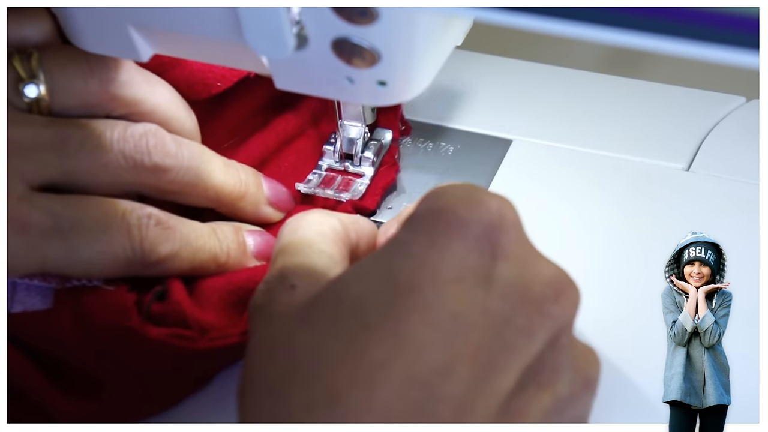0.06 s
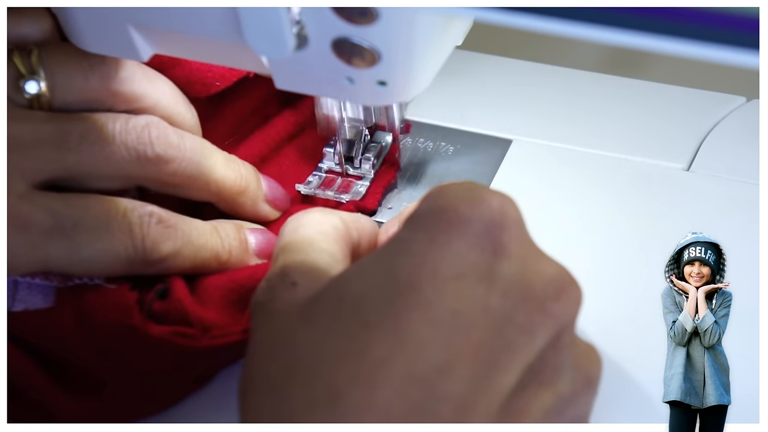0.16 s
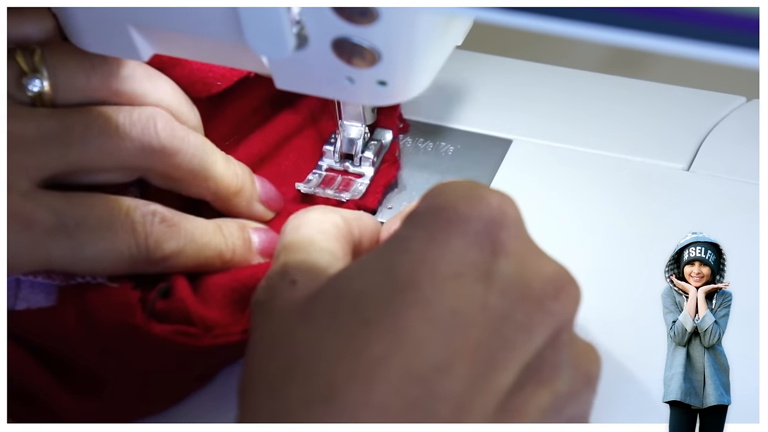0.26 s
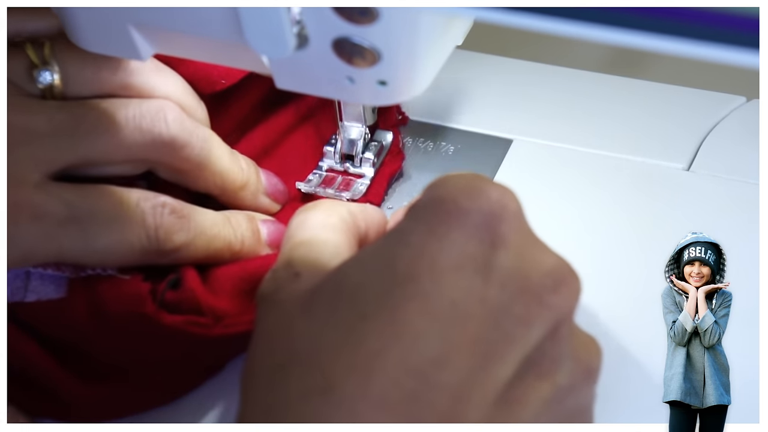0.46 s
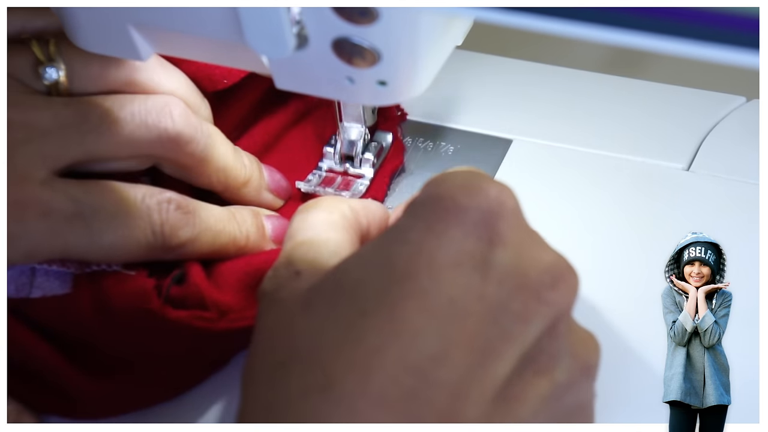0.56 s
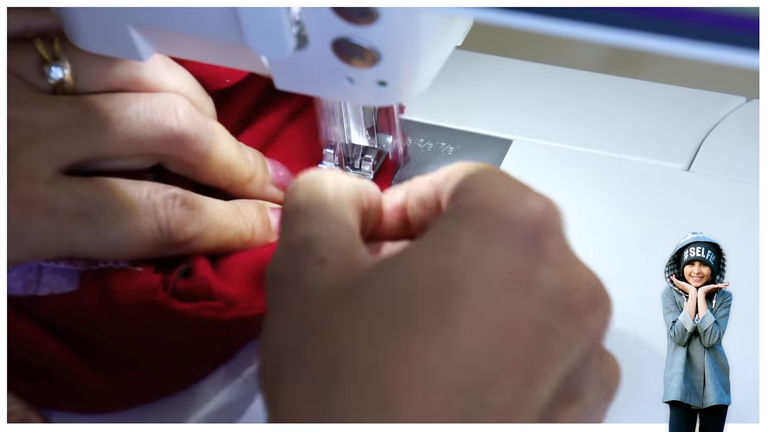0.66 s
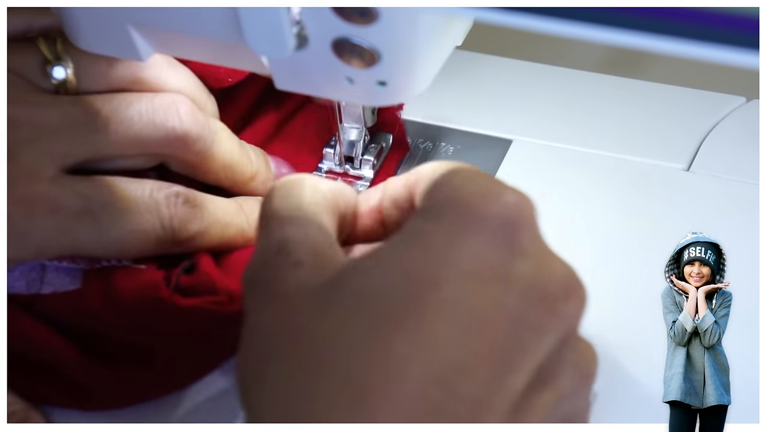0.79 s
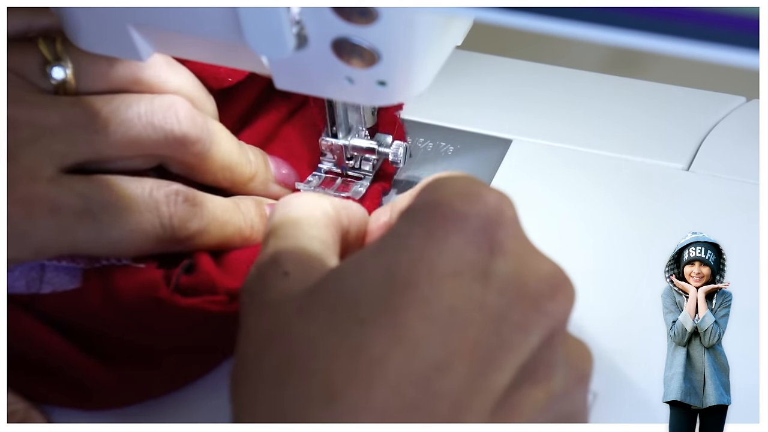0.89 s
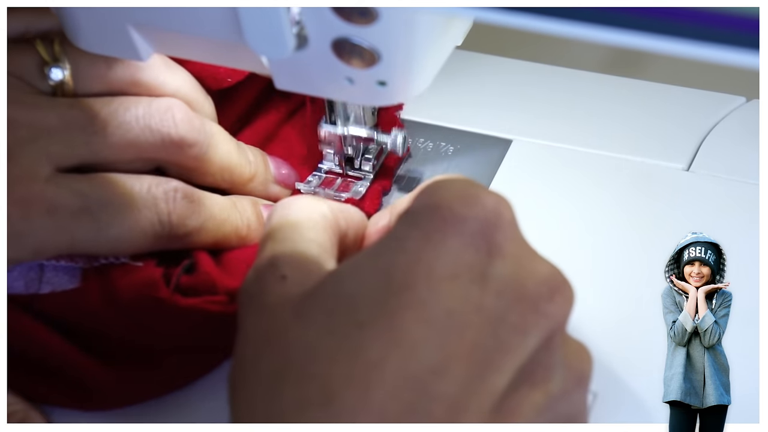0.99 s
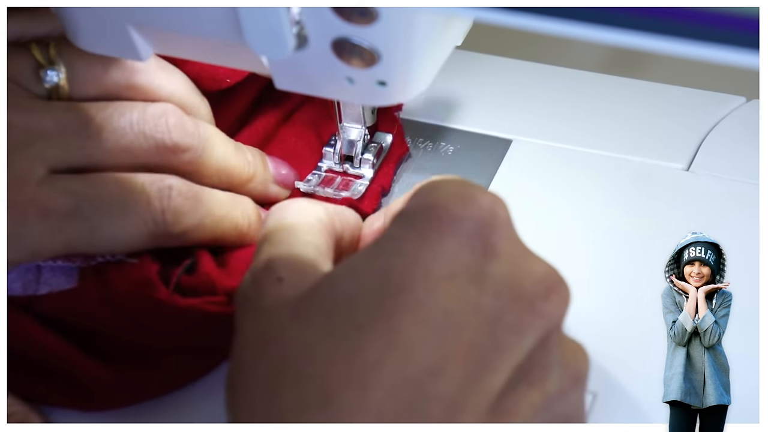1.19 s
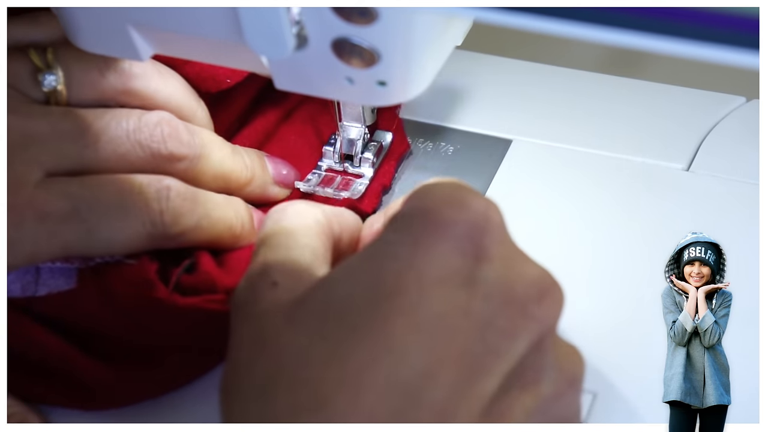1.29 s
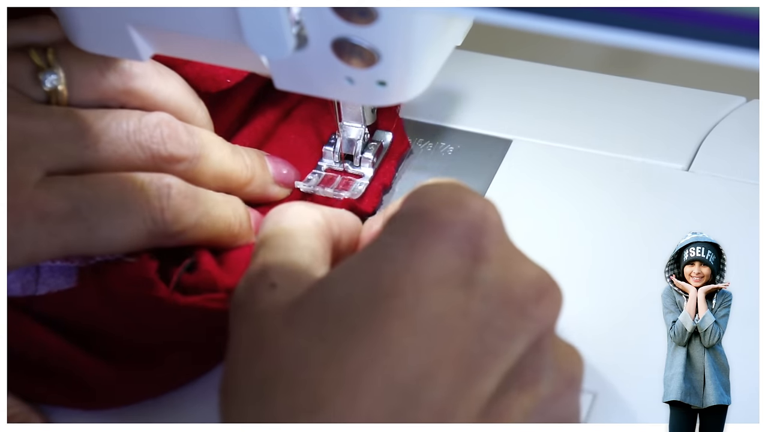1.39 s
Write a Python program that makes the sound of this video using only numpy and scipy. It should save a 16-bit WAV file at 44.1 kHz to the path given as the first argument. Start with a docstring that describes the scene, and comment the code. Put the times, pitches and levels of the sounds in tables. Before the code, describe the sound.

A domestic sewing machine, close by in a small room, starts with a short scrape, hums and whines through six quick ticking stitches, then stops with a hollow clunk. Fabric rustles faintly before and after, with a few soft knocks.

```python
"""A domestic sewing machine, close by in a small room, over a low rumble and faint hiss.
Fabric is nudged under the foot, then the drive starts with a short scrape. As the shaft runs up,
the case drones, the motor hums and whines and the linkages rattle. Six stitches follow, each a
bright tick and duller clacks. The machine coasts to a stop with a hollow clunk, and the fabric
is nudged again among a few soft knocks."""
import sys
import numpy as np
from scipy import signal
from scipy.fft import rfft, irfft
from scipy.io import wavfile
from scipy.ndimage import uniform_filter1d

SR = 44100
rng = np.random.default_rng(int(sys.argv[2]) if len(sys.argv) > 2 else 0)


def waveform_to_disk(signal):
    """Save audio, clipped to [-1, 1], as 16-bit WAV at the path in sys.argv[1]."""
    frames = np.transpose(np.atleast_2d(signal))
    scaled = np.clip(frames, -1, 1) * 32767
    samples = np.round(scaled).astype(np.int16)
    wavfile.write(sys.argv[1], SR, samples)


N = 63945
TIME, FREQ = np.arange(N) / SR, np.fft.rfftfreq(N, 1 / SR)


def amp(db):
    """Decibels to gain."""
    return 10 ** (np.asarray(db) / 20)


def unit(x):
    """Scales to rms 1."""
    return x / np.sqrt(np.mean(abs(x) ** 2) + 1e-20)


def curve(points):
    """A control curve over time."""
    return np.interp(TIME, *np.transpose(points))


def spectrum(points):
    """A table read on a log-frequency axis."""
    hz, value = np.transpose(points)
    return np.interp(np.log(FREQ + 1), np.log(hz + 1), value)


def wander(rate_hz):
    """Random motion of rms 1, mostly below rate_hz."""
    return unit(irfft(rfft(rng.standard_normal(N)) / (1 + (FREQ / rate_hz) ** 4), N))


def flutter(depth_db, rate_hz):
    """An uneven gain of rms 1."""
    return unit(amp(depth_db * wander(rate_hz)))


def steady(x):
    """Evens out the slow swells of a noise, leaving its fast churn."""
    return x / np.sqrt(uniform_filter1d((x ** 2).mean(0), size=1800))


def tone(cycles, width_hz):
    """A wavering tone of rms 1 that follows a count of cycles."""
    drift = np.cumsum(width_hz / 2 * wander(width_hz)) / SR
    return np.sqrt(2) * np.sin(2 * np.pi * (cycles + drift + rng.random()))


def burst(start_s, rise_s, decay_s, hold_s=0):
    """Linear attack, hold, exponential release."""
    t = TIME - start_s
    return np.clip(t / rise_s, 0, 1) * np.exp(-np.maximum(t - rise_s - hold_s, 0) / decay_s)


# Stereo phase. Each row: frequency in Hz, lead of the left channel in radians.
LEFT_LEAD = [(0, 0.51), (340, 0.97), (1120, -0.0067), (3270, -0.52), (5940, 0.37), (9130, 0.25),
             (9820, -1.2), (13400, 0.72)]
# Stereo balance. Each row: frequency in Hz, left minus right in dB.
BALANCE = [(60, 3.5), (200, -2), (700, -1), (8120, -0.7), (15000, -3.5)]


def stereo(left, right):
    """Two spectra to a stereo signal, offset in level and phase."""
    side = amp(spectrum(BALANCE) / 2)
    lag = np.exp(-1j * spectrum(LEFT_LEAD))
    return irfft(np.array([left * side, right * lag / side]), N)


# Likeness of the channels. Each row: frequency in Hz, correlation from 0 to 1.
COHERENCE = [(30, 0.7), (150, 0.98), (400, 0.94), (1000, 0.69), (2400, 0.6), (5000, 0.79), (8000, 0.92),
             (13000, 0.28)]


def noise(colour_db):
    """Coloured stereo noise of rms 1, partly alike in both channels."""
    shared, separate = rfft(rng.standard_normal((2, N))) * amp(colour_db)
    likeness = spectrum(COHERENCE)
    return unit(stereo(shared, likeness * shared + np.sqrt(1 - likeness ** 2) * separate))


# Rumble and hiss spectra. Each row: frequency in Hz, gain in dB.
RUMBLE_COLOUR = [(20, -31), (40, -6), (63, -8.5), (85, -36), (110, -11), (145, -14), (176, -0.5), (210, -4),
                 (370, -9), (750, -27), (1000, -45), (16000, -63)]
HISS_COLOUR = [(500, 0), (1400, 1), (2200, -3), (4200, 1), (5800, -4), (7500, -3), (11000, -7),
               (13000, -14), (16000, -18)]
# Their envelopes. Each row: time in seconds, level in dB.
RUMBLE_ENVELOPE = [(0, -52.5), (.9, -47.5), (1.3, -52.5), (1.37, -45.5), (1.41, -55)]
HISS_ENVELOPE = [(0, -66), (.8, -63.5), (1, -65.5), (1.25, -66), (1.45, -69)]


def background():
    """Lumpy low room rumble and faint hiss."""
    rumble = steady(noise(spectrum(RUMBLE_COLOUR))) * flutter(depth_db=2, rate_hz=42)
    hiss = noise(spectrum(HISS_COLOUR))
    return amp(curve(RUMBLE_ENVELOPE)) * rumble + amp(curve(HISS_ENVELOPE)) * hiss


def room(x, t60_s=0.24, level_db=-7.5):
    """Wall reflections: a short diffuse tail, different in each channel."""
    t = TIME[:SR // 2]
    tail = rng.standard_normal((2, len(t))) * np.exp(-np.log(1000) * t / t60_s) * (t > .003)
    return amp(level_db) * signal.fftconvolve(x, tail / np.linalg.norm(tail[0]), axes=1)[:, :N]


# Cloth slides. Each row: start in seconds, level in dB, rise and decay in seconds, tilt in dB/octave.
CLOTH_SLIDES = [(0.018, -61, 0.0044, 0.13, 6.5), (0.244, -51.5, 0.0039, 0.013, 8.5),
                (.832, -54.5, .012, 0.017, 5.5), (1.092, -64.5, 0.011, 0.021, 29),
                (1.244, -57.5, 0.021, 0.043, 2), (1.309, -56.5, 0.0081, 0.018, 2.5)]
# Snags of thread and cloth. Each row: start in seconds, level in dB, tilt in dB/octave.
CLOTH_SNAGS = [(0.018, -57, -1), (0.03, -53, -2.5), (.176, -56, 3), (0.215, -58.5, 13.5), (1.257, -61, 4),
               (1.275, -51, -3.5), (1.3078, -52, 7)]
# Their spectra before the tilt. Each row: frequency in Hz, gain in dB.
SLIDE_COLOUR = [(500, -18), (1400, 16), (2200, 2.5), (3900, 18.5), (5500, 1.5), (7500, 3.5), (11500, -7),
                (16000, -23)]
SNAG_COLOUR = [(1500, -12), (4000, -3), (7000, 0), (9500, -6), (11800, -1), (13000, -12), (16000, -19)]


def fabric(pivot_hz=4000):
    """Cloth slides and catches under the presser foot."""
    octaves = np.log2(np.clip(FREQ / pivot_hz, 0.1, 2.5))
    slides = sum(amp(db) * burst(start, rise, decay) * noise(spectrum(SLIDE_COLOUR) + tilt * octaves)
                 for start, db, rise, decay, tilt in CLOTH_SLIDES)
    snags = sum(amp(db) * burst(start, rise_s=0.0011, decay_s=0.0041)
                * noise(spectrum(SNAG_COLOUR) + tilt * octaves) for start, db, tilt in CLOTH_SNAGS)
    return slides * flutter(depth_db=2, rate_hz=400) + snags


# Case resonances. Each row: centre in Hz, width in Hz, lift in dB.
CASE_RESONANCES = [(179.6, 8.9, 6.5), (371.3, 26, 12), (469, 33, 6.5), (660, 24, 8.5), (763, 8.6, 9.5),
                   (832, 32, 8.5)]
# Drone and knock spectra before the resonances. Each row: frequency in Hz, gain in dB.
DRONE_COLOUR = [(20, -29), (55, -33), (85, -17), (115, -6), (145, -12), (180, 0.5), (270, 3), (400, -6),
                (550, -4.5), (750, -15), (2000, -55), (16000, -80)]
KNOCK_COLOUR = [(40, -46), (120, -9), (180, 0), (400, -6.5), (600, -10.5), (900, -29.5), (2000, -59),
                (16000, -70)]
# Drone envelope. Each row: time in seconds, level in dB.
DRONE_ENVELOPE = [(.1, -54.5), (.15, -46.5), (.29, -42.5), (.34, -39.5), (.45, -35), (.53, -35.5),
                  (.58, -31.5), (.74, -32), (.78, -42.5), (.83, -47), (.95, -71)]
# Soft knocks. Each row: start in seconds, level in dB.
CASE_KNOCKS = [(0.235, -39), (0.325, -38), (0.894, -44), (1.182, -46), (1.269, -47), (1.337, -50),
               (1.428, -50)]


def case():
    """The running gear and a few knocks shake the resonant plastic case."""
    modes_db = sum(db / (1 + (2 * (FREQ - hz) / width) ** 2) for hz, width, db in CASE_RESONANCES)
    drone = amp(curve(DRONE_ENVELOPE)) * steady(noise(spectrum(DRONE_COLOUR) + modes_db))
    knocks = sum(amp(db) * burst(start, rise_s=0.0023, decay_s=0.02) for start, db in CASE_KNOCKS)
    return drone + knocks * steady(noise(spectrum(KNOCK_COLOUR) + modes_db))


# Scrape spectrum. Each row: frequency in Hz, gain in dB.
SCRAPE_COLOUR = [(300, 11), (900, 2.5), (1500, 3), (2300, 9), (3000, 1.5), (4500, 4), (6000, -9),
                 (10000, -14.5), (16000, -35)]


def scrape(level_db=-47.5):
    """A short scrape as the drive starts to move."""
    envelope = burst(start_s=0.1283, rise_s=.004, decay_s=0.036, hold_s=0.037)
    return amp(level_db) * envelope * noise(spectrum(SCRAPE_COLOUR))


# Clunk spectrum. Each row: frequency in Hz, gain in dB.
CLUNK_COLOUR = [(100, -30), (350, 0.5), (660, -9.5), (900, -27), (4000, -60)]


def clunk(level_db=-44.5):
    """A hollow clunk as the gear comes to rest."""
    envelope = burst(start_s=.83, rise_s=0.0071, decay_s=0.0092, hold_s=0.031)
    return amp(level_db) * envelope * steady(noise(spectrum(CLUNK_COLOUR)))


# Main shaft speed. Each row: time in seconds, stitches per second.
SHAFT_RATE = [(.13, 1.62), (.2, 4.8), (.3, 7.3), (.36, 9.56), (.44, 10.25), (.5, 11.38), (.55, 12.17),
              (.6, 12.43), (.66, 12.7), (.7, 11.3), (.75, 10.23), (.8, 5.7), (.89, .5)]


def shaft(full_rate_hz=12.5):
    """Speed as a share of full speed, and turns made at one per stitch."""
    rate_hz = curve(SHAFT_RATE) * (TIME > SHAFT_RATE[0][0]) * (TIME < SHAFT_RATE[-1][0])
    return rate_hz / full_rate_hz + 1e-6, np.cumsum(rate_hz) / SR


# Low hum envelope. Each row: time in seconds, level in dB.
LOW_HUM_ENVELOPE = [(0, -52.5), (.29, -57), (.335, -38.5), (.39, -41), (.42, -55), (.5, -43.5), (.555, -32),
                    (.635, -34), (.705, -38), (.79, -44.5), (.98, -55.5), (1.45, -57)]


def low_hum(pitch_hz=180.54):
    """A wavering low hum, faint throughout, swelling to a boom while the machine runs."""
    envelope = amp(curve(LOW_HUM_ENVELOPE)) * flutter(depth_db=2.2, rate_hz=28)
    return envelope * tone(pitch_hz * TIME, width_hz=12)


# Drive hum tones. Each row: cycles per stitch, width in Hz.
HUM_TONES = [(21.475, 12.7), (29.5, 9.8), (42.9, 6.7)]
# Their envelopes. Each row: time in seconds, then each tone's level in dB before the speed fade.
HUM_ENVELOPES = [(.22, -68.5, -70, -74), (.37, -37, -70, -38.5), (.44, -38, -52.5, -39.5),
                 (.52, -39.5, -48.5, -43), (.6, -30, -38, -44), (.645, -34, -38.5, -57),
                 (.72, -38.5, -37, -46.5), (0.831, -70, -73, -50)]


def drive_hum(speed, turns):
    """Belt and motor tones glide with shaft speed, each swelling and fading on its own envelope."""
    times, *levels_db = np.transpose(HUM_ENVELOPES)
    tones = sum(amp(np.interp(TIME, times, db)) * flutter(depth_db=2.5, rate_hz=60)
                * tone(order * turns, width) for (order, width), db in zip(HUM_TONES, levels_db))
    return tones * np.minimum(speed * 2, 1)  # fades below half speed


# Whine tones. Each row: cycles per stitch, full-speed dB before the housing, width in Hz, speed power.
WHINE_TONES = [(124.1, -54.5, 41, 2.6), (255.3, -48, 156, 3.8), (371.8, -52.5, 125, 1.26)]


def whine(speed, turns, motor_off_s=0.74, decay_s=0.068):
    """A rough motor whine that grows with speed and dies away as the machine coasts."""
    tones = sum(amp(db) * speed ** power * flutter(depth_db=4, rate_hz=110) * tone(order * turns, width)
                for order, db, width, power in WHINE_TONES)
    return tones * np.exp(-np.maximum(TIME - motor_off_s, 0) / decay_s)


# Motor housing response. Each row: frequency in Hz, gain in dB.
HOUSING_RESPONSE = [(900, -21), (1200, -3), (1450, 4.5), (1700, -9.5), (2300, -9), (2950, -4), (3450, -3),
                    (4000, -6), (4700, 0)]


def motor(speed, turns):
    """Both hums, plus the whine heard through the motor housing."""
    low = rfft(drive_hum(speed, turns) + low_hum())
    high = rfft(whine(speed, turns)) * amp(spectrum(HOUSING_RESPONSE))
    return stereo(low + high, low + high)


# Rattle spectrum. Each row: frequency in Hz, gain in dB.
RATTLE_COLOUR = [(400, 11), (900, -2.5), (1500, 5), (2300, 0), (3300, 4), (4600, 3.5), (7000, -2),
                 (9000, -4.5), (12000, -9.5), (16000, -25)]


def rattle(speed, turns, first_stitch_s, full_speed_db=-43, feed_db=1.5, feed_peak_turns=0.29):
    """Fine grainy chatter of the linkages, swelling once a stitch as the feed moves."""
    stitch_turns = turns - np.interp(first_stitch_s, TIME, turns)
    swell_db = feed_db * np.cos(2 * np.pi * (stitch_turns - feed_peak_turns))
    chatter = noise(spectrum(RATTLE_COLOUR)) * flutter(depth_db=1.5, rate_hz=360)
    return chatter * amp(full_speed_db + swell_db) * speed ** 1.95


# The tick opening each stitch. Each row: start in seconds, level in dB.
STITCH_TICKS = [(.2932, -38), (.4085, -36), (.5022, -37.5), (.5862, -36.5), (.6662, -36.5), (.7664, -41)]
# Clacks after the ticks. Each row: start in seconds, level in dB, decay in seconds.
STITCH_CLACKS = [(0.3156, -37.5, 0.0047), (0.3365, -41.5, 0.0024), (0.4264, -36.5, .007),
                 (0.4412, -37, 0.0074), (0.4766, -35, .0025), (.5178, -33, 0.0055), (.5313, -36.5, 0.0073),
                 (.5627, -35, .004), (0.6006, -32.5, 0.0067), (0.6128, -36.5, 0.015),
                 (0.6424, -36.5, 0.0077), (0.6798, -33.5, 0.0077), (0.696, -40.5, 0.017),
                 (0.7309, -38.5, 0.0028), (0.7912, -45.5, .008)]
# Their spectra. Each row: frequency in Hz, gain in dB.
TICK_COLOUR = [(800, 2), (2200, -17), (4500, -25), (6100, 5.5), (8200, 3.5), (10000, -12), (11700, -7),
               (13000, -23), (16000, -24)]
CLACK_COLOUR = [(800, 4), (2200, -20), (3300, 1.5), (4800, 4.5), (7200, 4), (9000, -2.5), (12000, -10),
                (16000, -20)]


def stitches(rise_s=.001):
    """Each stitch: a bright tick, then duller clacks of needle bar, hook and feed."""
    ticks = sum(amp(db) * burst(start, rise_s, decay_s=.0012, hold_s=0.0035)
                for start, db in STITCH_TICKS)
    clacks = sum(amp(db) * burst(start, rise_s, decay) for start, db, decay in STITCH_CLACKS)
    return ticks * noise(spectrum(TICK_COLOUR)) + clacks * noise(spectrum(CLACK_COLOUR))


def scene():
    """Machine, fabric and background; stitches, rattle and fabric also feed the room tail."""
    speed, turns = shaft()
    bright = stitches() + rattle(speed, turns, first_stitch_s=STITCH_TICKS[0][0]) + fabric()
    return bright + room(bright) + case() + motor(speed, turns) + scrape() + clunk() + background()


def record(dry):
    """A steep low-pass removes the highest treble."""
    lowpass = signal.firwin(511, cutoff=15750, window=("kaiser", 9), fs=SR)
    return signal.oaconvolve(dry, lowpass[None], "same")


dry = scene()
out = record(dry)
waveform_to_disk(out)
```